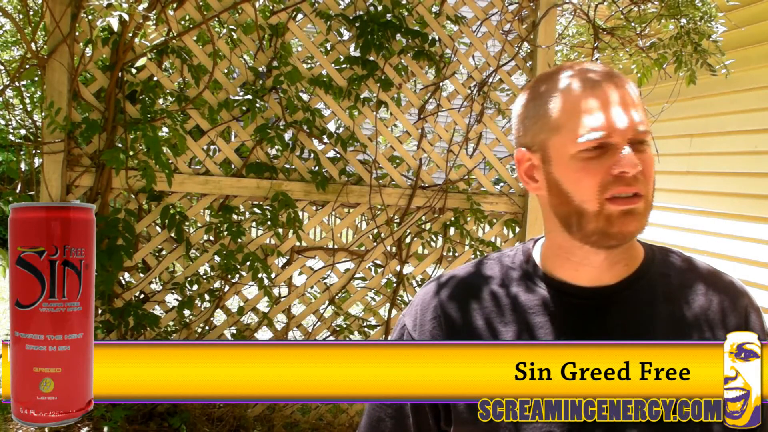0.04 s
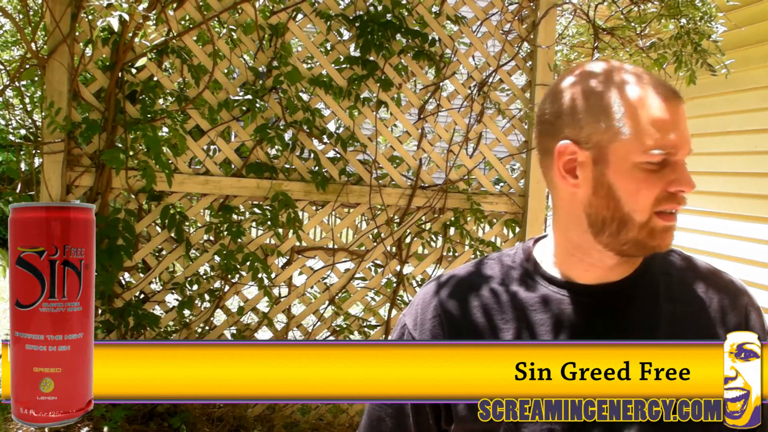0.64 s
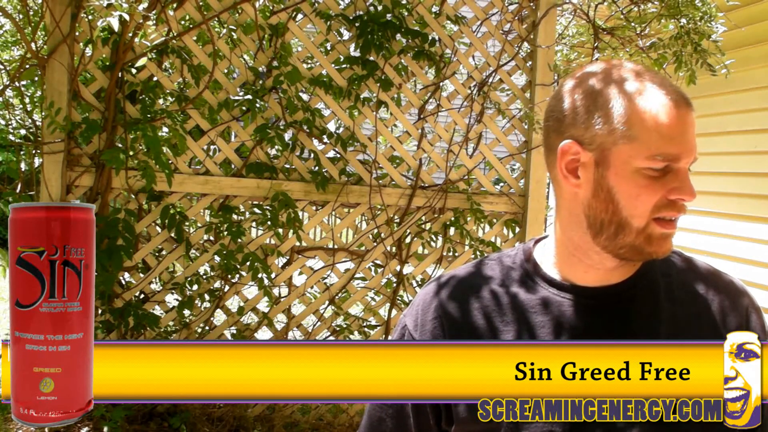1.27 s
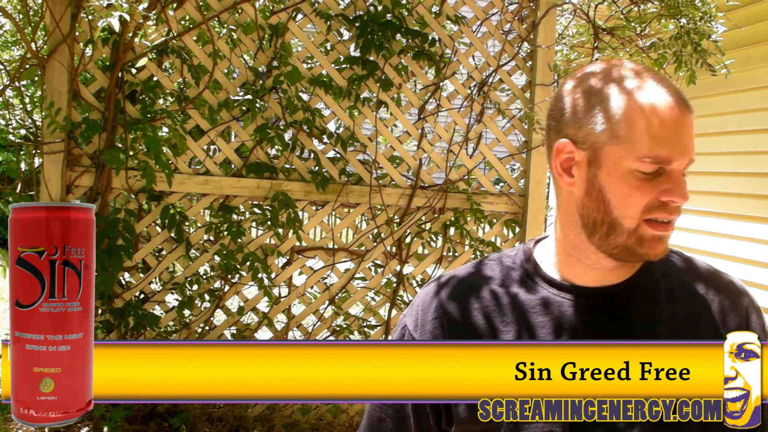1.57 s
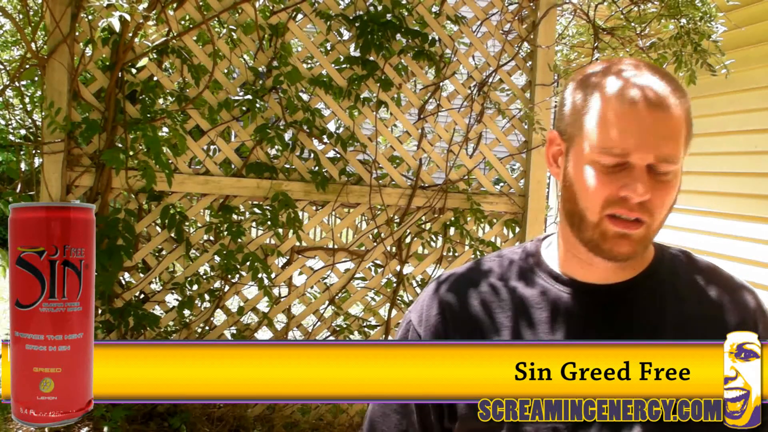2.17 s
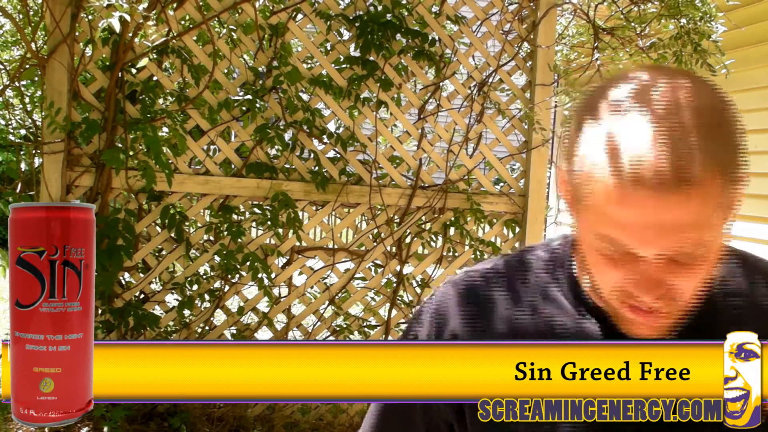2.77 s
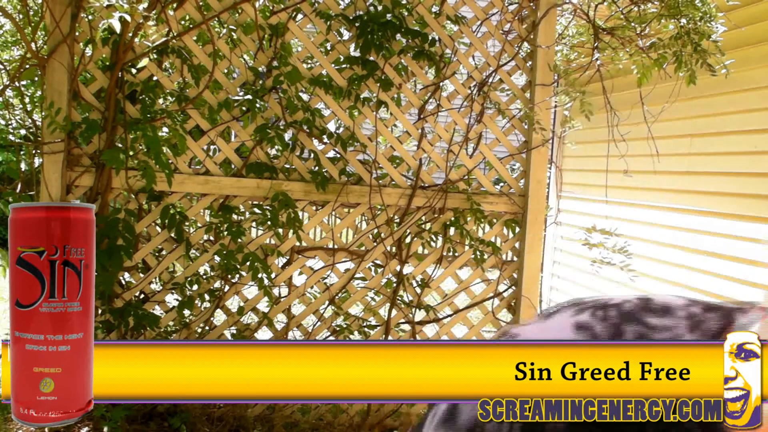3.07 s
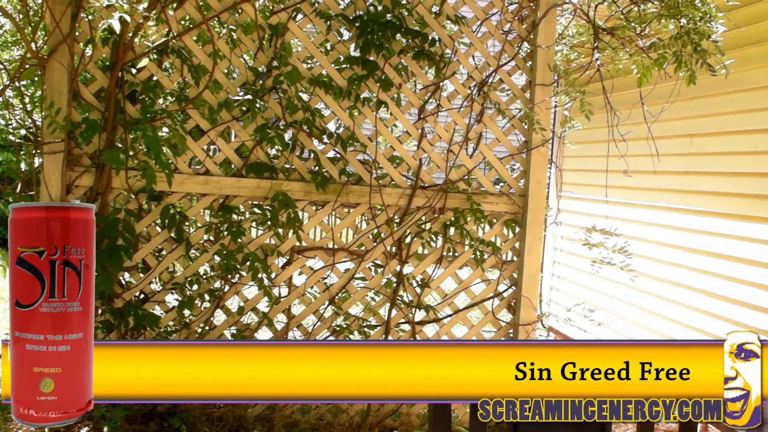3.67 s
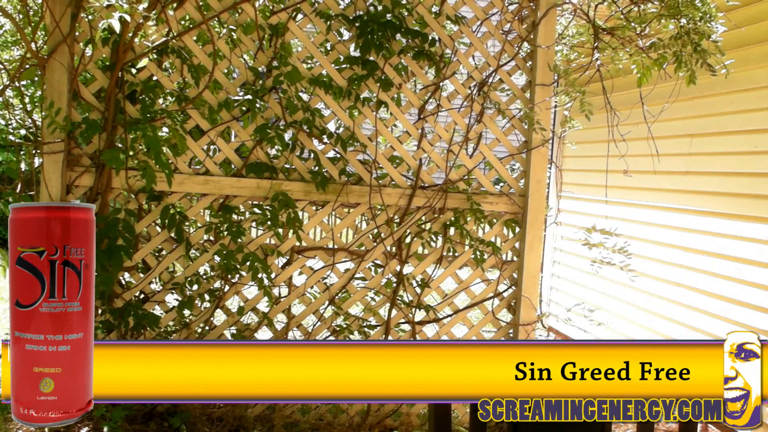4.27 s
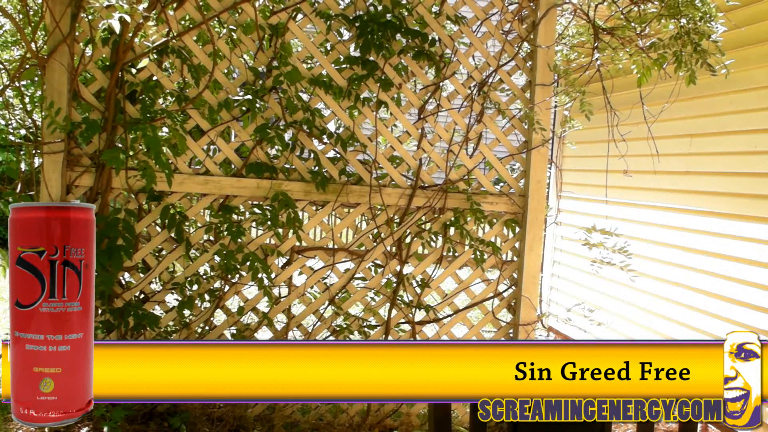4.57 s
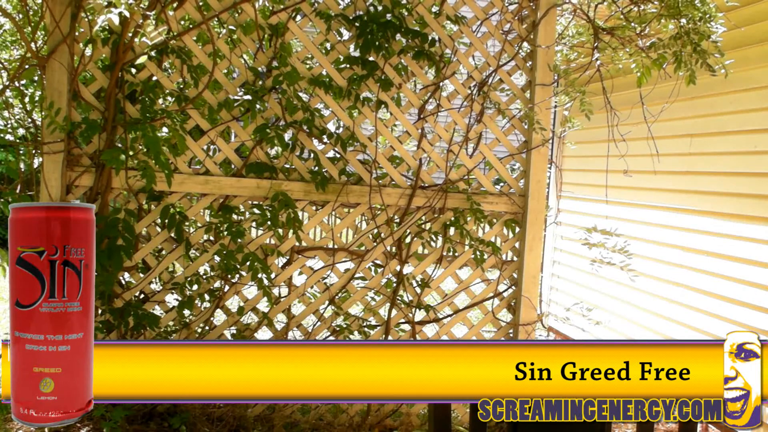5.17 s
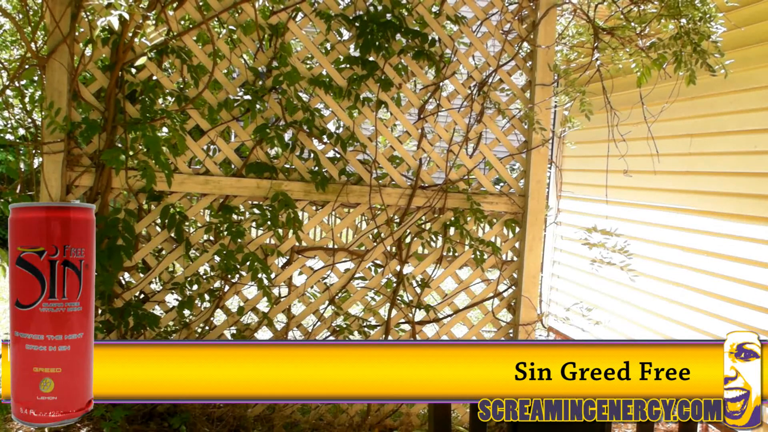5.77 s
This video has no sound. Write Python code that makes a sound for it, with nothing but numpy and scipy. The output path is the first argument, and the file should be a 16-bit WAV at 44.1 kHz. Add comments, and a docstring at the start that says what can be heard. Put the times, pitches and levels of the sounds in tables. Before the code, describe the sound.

A quiet yard holds a low neighbourhood rumble and a wavering hum throughout, with faint calls of distant birds. From about 1.5 seconds clothes rustle softly, with a few tiny dry ticks, as someone gets up and moves off. At 1.7 seconds a small bird nearby gives one slurred, falling chirp, then a loose run of short, gliding notes from 2.2 to 3.5 seconds, lightly echoing off a wall and fence. At about 3.4 seconds one sharp, rattling clack stands out as the loudest sound. The bird gives another falling chirp at 4 seconds and a very brief, sharp chip near 4.75. Soft wooden knocks of feet and furniture and a few light shoe scuffs are scattered between 2 and 5.2 seconds, the clearest near 4.6. The rustling fades by about 5.3 seconds, leaving the hum and a faint distant call.

```python
"""A quiet yard beside a house wall and a fence, where a small bird sings short, slurred, mostly falling chirps.
Its syrinx gives a gliding near-sine tone, which hard surfaces reflect and foliage scatters.
Someone gets up and moves off: friction rustles the clothes, and impacts give one rattling clack and
a few soft knocks. Faint high overtones of the near bird's chirps and the calls of distant birds
sound over a low neighbourhood rumble and a wavering hum."""
import sys
import numpy as np
from scipy import signal
from scipy.fft import rfft, irfft, next_fast_len
from scipy.io import wavfile

SR = 44100
rng = np.random.default_rng(int(sys.argv[2]) if len(sys.argv) > 2 else 0)


def output_pcm(signal):
    """Save a mono or channel-first signal as 16-bit PCM at the path in sys.argv[1].

    Samples are clipped to [-1, 1] before scaling.
    """
    pcm = np.clip(np.atleast_2d(signal).T, -1, 1) * 32767
    wavfile.write(sys.argv[1], SR, np.round(pcm).astype(np.int16))


N = 256734
TIME = np.arange(N) / SR

# Levels in the tables are relative; the mix adds further gain.
# near bird's slurs: (crest time [s], scoop length [s], fall length [s], foot length [s],
# scoop pitch [Hz], scoop level [dB], fall level [dB], foot level [dB])
SLURS = [(1.7615, .063, .090, .045, 3210, -35, -32, -42),
         (3.9598, .070, .077, .050, 3148, -27.3, -25.3, -37.5)]
# its other syllables: (time [s], length [s], first pitch [Hz], middle pitch [Hz], last pitch [Hz],
# opening flick [Hz], level [dB], attack [s], release [s])
SYLLABLES = [ (2.188, .059, 3266, 2858, 1971, 29, -29.7, .037, .027),
             (2.2417, .033, 2601, 2778, 3295, 0, -29.3, .023, .001),
             (2.2721, .086, 2822, 2425, 2298, 579, -27.4, .002, .052),
             (2.3434, .079, 2389, 2247, 2700, 67, -33.3, .027, .006),
             (2.7425, .060, 2490, 2424, 2280, 0, -30.6, .036, .010),
             (2.8028, .103, 2342, 2598, 2912, 9, -27.4, .026, .008),
             (3.2658, .113, 3208, 2973, 2279, -40, -27, .033, .001),
             (3.380, .066, 2300, 2570, 2720, 0, -30.5, .003, .035),
             (3.4465, .053, 3269, 2556, 2573, 469, -26.7, .004, .011),
             (4.7486, .007, 3340, 2804, 1900, 190, -20.6, .001, .006),
             (4.7532, .015, 2620, 2521, 2620, 420, -21.5, .006, .001)]
# one drier low pip, columns as in SYLLABLES
PIP = (2.919, .060, 2120, 2143, 2128, -70, -23.8, .036, .016)
# reflections off wall and fence: (delay [s], left gain [dB], right gain [dB])
ECHOES = [(.0062, -8.5, 0), (0.0125, -1, -10.5), (.016, -1, 1), (.020, 3, -13), (.031, -10, -4),
          (.044, -15, -4), (.083, -13, -12)]
# foliage returns the top of the song most strongly: (frequency [Hz], gain [dB])
LEAF_SPECTRUM = [(2000, -1), (2800, 0), (3450, 2.5), (3900, -4)]
# hard contacts of the clack: (time [s], body level [dB], crack level [dB])
CONTACTS = [(3.3466, -11, -13.5), (3.352, -11.5, -19), (3.3572, -5.5, -18), (3.3575, -13.5, -25),
            (3.362, -11.5, -12), (3.367, -4, -11.5), (3.3716, -8, -10), (3.3766, -8.5, -11.5),
            (3.380, -9.5, -10), (3.387, -20, -14.5)]
# soft knocks of feet and furniture: (time [s], level [dB])
KNOCKS = [(1.937, -36), (3.583, -40), (4.015, -35), (4.633, -30.5), (4.644, -40), (5.170, -39)]
# modes of the struck parts: (frequency [Hz], level [dB], 60 dB decay time [s])
CLACK_MODES = [(480, 0.5, 0.04), (546, 3, .1), (726, -1.5, 0.16), (896, 4.5, 0.14), (930, -10, .1),
               (1134, -9, 0.091), (1300, 6, 0.078), (1580, -8, 0.064), (1735, 1, .14), (1924, -16, .14),
               (2070, -3, 0.12), (2247, 1, 0.12)]
KNOCK_MODES = [(200, -32.5, .07), (404, -10, 0.18), (510, 6, 0.024), (580, -6, 0.056), (833, -10, 0.049),
               (1180, -26, 0.024)]
# swells of cloth noise and of rumble: (peak time [s], length [s], level [dB])
SWISHES = [(1.76, .2, -51.5), (2.33, 0.35, -51), (2.87, 0.24, -48), (3.12, 0.31, -46.5),
           (3.54, 0.14, -42.5), (4.07, 0.25, -44.5), (4.80, .2, -59)]
RUMBLE_SWELLS = [(4.42, .95, -54.5)]
# shoe scuffs and, at 3.337 s, a very brief swell of noise just before the clack:
# (peak time [s], length [s], level [dB])
BRIEF_SWELLS = [(2.978, 0.14, -46), (3.337, .013, -31), (4.639, 0.072, -46), (5.167, 0.089, -44.5)]
# tiny dry ticks: (time [s], level [dB], centre frequency [Hz])
TICKS = [(1.630, -46, 9050), (1.692, -39, 11500), (1.740, -30.5, 5300), (3.116, -40, 12000),
         (3.550, -43, 9500), (3.847, -38, 6500), (3.985, -39, 12500), (4.144, -33, 13000),
         (4.748, -40, 5000)]
# faint high overtones of the near bird's chirps (at 2.20 and 3.915 s) and distant calls (the rest):
# (time [s], length [s], first pitch [Hz], last pitch [Hz], level [dB])
FAINT_GLIDES = [(.84, .13, 6700, 6600, -61), (0.779, .31, 2700, 2826, -61), (0.979, .10, 2350, 2150, -56.5),
                (1.06, 0.074, 6300, 6700, -62), (1.35, 0.04, 5400, 6400, -58),
                (1.44, 0.069, 2950, 3080, -59), (2.20, .055, 5880, 5430, -53),
                (3.915, .09, 6400, 7100, -57), (4.39, .11, 2974, 2580, -49.5),
                (4.49, 0.111, 2160, 1980, -52), (4.654, 0.091, 6650, 6950, -56),
                (4.89, .18, 1443, 1400, -55.5), (5.698, 0.11, 1335, 1360, -56.5)]
# one hoarse distant call, columns as in FAINT_GLIDES
RASP = (2.915, .10, 4120, 3760, -49.5)
# noise spectra: (frequency [Hz], spectral density level [dB])
BODY_SPECTRUM = [(70, -34), (130, -8), (250, -17), (460, 1), (800, 0.3), (1300, 0), (1750, 0), (2500, -9),
                 (3500, -5.5), (5600, -14.5), (7000, -12), (9000, -49)]
CRACK_SPECTRUM = [(1500, -19), (3000, -3), (6300, -1.5), (7600, -10.5), (10000, -4), (15500, -8.5)]
RUSTLE_SPECTRUM = [(500, 4), (1500, 7.5), (4000, 2.5), (6300, 3), (7800, -9.5), (11000, -2.5), (15500, -5)]
BRIEF_SWELL_SPECTRUM = [(200, 6), (600, 10.5), (1500, 1.5), (4000, -0.5), (8000, -7.5), (12000, -2.5),
                        (15500, -7)]
AIR_SPECTRUM = [(22, -40), (38, -15.5), (70, -9), (112, -3.5), (131, -3), (145, -10.5), (228, -15),
                (259, -23), (417, -8.5), (984, -18), (1170, -19.5), (1470, -22), (3060, -26.5),
                (4040, -29.5), (15800, -40)]
RUMBLE_SPECTRUM = [(55, -7), (78, 0), (100, -8), (200, -39), (1000, -90)]
# likeness of the channels for near and far noise: (frequency [Hz], correlation [-1 to 1])
NEAR_CORRELATION = [(200, .9), (1400, 0.78), (3100, 0.57), (6800, -0.1), (13000, -0.019)]
FAR_CORRELATION = [(60, 0.99), (150, 0.93), (380, 0.9), (950, 0.88), (2380, 0.56), (5980, 0.04),
                   (15000, -0.17)]
# stereo balance of the air: (frequency [Hz], left minus right [dB])
AIR_BALANCE = [(60, -1.5), (180, -2.5), (550, -1.5), (1650, -1.5), (4970, 0.5), (15000, 0)]


def near_bird():
    """Multipath propagation: the song arrives directly, off hard surfaces and through foliage."""
    notes = [note for row in SLURS for note in slur(*row)] + [syllable(*row) for row in SYLLABLES]
    song = from_db(-3) * whistle(notes, waver=.0041, edge_s=.0022, overtone_db=-37)
    pip = whistle([syllable(*PIP)], waver=.002, edge_s=.004, overtone_db=-40)
    direct = (song + pip) * pan(-.3)
    spread = song + from_db(-14) * pip
    echoes = sum(delayed(spread, s) * from_db([[left], [right]]) for s, left, right in ECHOES)
    early = from_db(-7) * scatter(spread, t60=.15, build_s=.004, correlation=.24)
    leaf_gain = from_db(at_hz(LEAF_SPECTRUM, np.fft.rfftfreq(N, 1 / SR)))
    leafy = irfft(rfft(spread) * leaf_gain, N)
    late = from_db(-5) * scatter(leafy, t60=.72, build_s=.02, correlation=.49)
    return direct + echoes + early + late


def whistle(notes, waver, edge_s, overtone_db):
    """Self-sustained oscillation: the syrinx gives a gliding, slightly trembling near-sine tone."""
    out = np.zeros(N)
    tremble = 1 + waver * drift(120)
    for note in notes:
        s, hz, level_db = np.transpose(note)
        on = (TIME >= s[0]) & (TIME <= s[-1])
        t = TIME[on]
        phase = 2 * np.pi * np.cumsum(np.interp(t, s, hz) * tremble[on]) / SR
        edges = np.sin(np.pi / 2 * np.clip(np.minimum(t - s[0], s[-1] - t) / edge_s, 0, 1)) ** 2
        tone = np.sin(phase) + from_db(overtone_db) * np.sin(2 * phase)
        out[on] += np.sqrt(2) * from_db(np.interp(t, s, level_db)) * edges * tone
    return out


def syllable(start, length, first_hz, middle_hz, last_hz, flick_hz, level_db, attack_s, release_s):
    """Frequency and amplitude modulation of one note, as rows of (time [s], pitch [Hz], level [dB])."""
    swell_db, flick_share = 20, .11
    u = np.linspace(0, 1, 60)   # share of the note elapsed
    bow_hz = middle_hz - (first_hz + last_hz) / 2
    arc_hz = first_hz + (last_hz - first_hz) * u + bow_hz * (1 - (2 * u - 1) ** 2)
    hz = arc_hz + flick_hz * np.exp(-u / flick_share)
    rising = np.maximum(1 - u * length / (attack_s + 1e-9), 0)
    fading = np.maximum(1 - (1 - u) * length / (release_s + 1e-9), 0)
    return np.transpose([start + u * length, hz, level_db - swell_db * (rising ** 2 + fading ** 2)])


def slur(crest, scoop_s, fall_s, foot_s, scoop_hz, scoop_db, fall_db, foot_db):
    """A continuous frequency sweep: a scoop up to a crest, a fading fall and a low, held foot."""
    flick_hz, crest_hz, mid_hz, bottom_hz, foot_hz = 786, 3515, 2385, 1740, 2055
    lift_hz = foot_hz - bottom_hz
    scoop = syllable(crest - scoop_s, scoop_s, scoop_hz, scoop_hz, crest_hz, flick_hz, scoop_db, .028, 0)
    fall = syllable(crest, fall_s, crest_hz, mid_hz, bottom_hz, 0, fall_db, 0, .087)
    foot = syllable(crest + fall_s, foot_s, foot_hz, foot_hz, foot_hz, -lift_hz, foot_db, .004, .003)
    return [scoop, fall, foot]


def clack():
    """Impact excitation: hard parts chatter, each contact giving a thud, a crack and a short ring."""
    s, body_db, crack_db = np.transpose(CONTACTS)
    blows = strikes(s, body_db)
    body = dying(blows, t60=.022) * noise(BODY_SPECTRUM, NEAR_CORRELATION)
    crack = dying(strikes(s, crack_db), t60=.021) * noise(CRACK_SPECTRUM, NEAR_CORRELATION)
    hit = body + crack + from_db(-21.5) * ring(blows, CLACK_MODES)
    bass_cut = signal.butter(2, 250, "high", fs=SR, output="sos")   # the clack carries little bass
    hit = signal.sosfilt(bass_cut, hit)
    wall = from_db(-2.5) * scatter(crack[0], t60=.16, build_s=.0087, correlation=-.091)
    deck = from_db(-13.5) * scatter(body[0], t60=.23, build_s=.0063, correlation=.76)
    yard = from_db(-24.5) * scatter(hit[0], t60=.62, build_s=.019, correlation=.69)
    return (hit + wall + deck + yard) * pan(-1.8)


def knocks():
    """Modal vibration of wood: soft contact excites little treble."""
    wood = ring(strikes(*np.transpose(KNOCKS)), KNOCK_MODES)
    wood = signal.sosfilt(signal.butter(2, [130, 1300], "band", fs=SR, output="sos"), wood)
    return wood + from_db(-4) * scatter(wood, t60=.13, build_s=.0063, correlation=.86)


def clothes(start_s=1.52, end_s=5.27, attack_s=.15, release_s=.45, crackles_per_s=260):
    """Friction noise: cloth rustles as the person moves, swishing and crackling at its creases."""
    moving = np.clip(np.minimum((TIME - start_s) / attack_s, (end_s - TIME) / release_s), 0, 1)
    motion = np.hypot(from_db(-59 + 7 * moving), swells(SWISHES))   # faint at rest
    creases = rng.random(N) < crackles_per_s / SR
    crackles = creases * from_db(4.1 * np.minimum(rng.exponential(1, N), 4))
    grain = .85 + .3 * rms_one(dying(crackles + 1e-18, t60=.006))
    flutter = from_db(1.15 * drift(33))
    return motion * flutter * grain * noise(RUSTLE_SPECTRUM, NEAR_CORRELATION)


def brief_swells():
    """Amplitude-modulated noise: three shoe scuffs, and a very brief swell just before the clack."""
    roughness = from_db(2.9 * drift(90))
    return swells(BRIEF_SWELLS) * roughness * noise(BRIEF_SWELL_SPECTRUM, NEAR_CORRELATION)


def ticks(bandwidth_hz=3500, t60=.06):
    """Resonance: each tiny noise burst is filtered around a high frequency of its own."""
    out = np.zeros((2, N))
    r = np.exp(-np.pi * bandwidth_hz / SR)
    hiss = noise([(1000, 0), (15000, 0)], NEAR_CORRELATION)
    for s, level_db, hz in TICKS:
        burst = dying(strikes([s], [level_db]), t60) * hiss
        out += signal.lfilter([1 - r, 0, r - 1], [1, -2 * r * np.cos(2 * np.pi * hz / SR), r * r], burst)
    return out


def faint_bird_tones():
    """Scattering outweighs direct sound in distant calls and two high overtones of the near bird."""
    tones = whistle([glide(*row) for row in FAINT_GLIDES], waver=.0173, edge_s=.01, overtone_db=-45)
    tones += whistle([glide(*RASP)], waver=.07, edge_s=.014, overtone_db=-40)
    return from_db(-2.5) * tones + scatter(tones, t60=.37, build_s=.0059, correlation=.33)


def glide(start, length, first_hz, last_hz, level_db):
    """A linear frequency sweep with soft ends."""
    middle_hz = (first_hz + last_hz) / 2
    return syllable(start, length, first_hz, middle_hz, last_hz, 0, level_db, .03, .029)


def neighbourhood(hum_hz=117.8, drone_hz=410):
    """Random modulation widens a machine hum and a far drone into narrow bands, over air and rumble."""
    air = from_db(-45.07 + .5 * drift(10)) * noise(AIR_SPECTRUM, FAR_CORRELATION, AIR_BALANCE)
    turn = 2 * np.pi * TIME
    hum = (.21 + .71 * drift(5.7)) * np.sin(turn * hum_hz) + .45 * drift(2.4) * np.cos(turn * hum_hz)
    drone = drift(68) * np.sin(turn * drone_hz) + drift(62) * np.cos(turn * drone_hz)
    rumble = (from_db(-65.5) + swells(RUMBLE_SWELLS)) * noise(RUMBLE_SPECTRUM, FAR_CORRELATION)
    return air + (from_db(-53) * hum + from_db(-55) * drone + rumble) * pan(-1.3)


def scatter(x, t60, build_s, correlation):
    """Diffuse scattering: convolution with a noise tail that builds up and decays."""
    t = TIME[:SR]
    mid, side = rng.standard_normal((2, SR)) * fade(t, t60) * (1 - np.exp(-t / build_s))
    tail = rms_one(stereo(mid, side, correlation)) / np.sqrt(SR)
    return signal.fftconvolve(x[None], tail, axes=1)[:, :N]


def ring(clicks, modes):
    """Modal superposition: each mode is a damped oscillator driven by the clicks."""
    out = np.zeros(N)
    for hz, level_db, t60 in modes:
        r, w = fade(1 / SR, t60), 2 * np.pi * hz / SR
        out += from_db(level_db) * signal.lfilter([0, np.sin(w)], [1, -2 * r * np.cos(w), r * r], clicks)
    return out


def strikes(times, levels_db):
    """Each blow is idealised as an impulse."""
    clicks = np.zeros(N)
    clicks[np.round(np.asarray(times) * SR).astype(int)] = from_db(levels_db)
    return clicks + 1e-18


def dying(clicks, t60):
    """Incoherent addition: the envelope of decaying bursts whose powers add."""
    return np.sqrt(signal.lfilter([1], [1, -fade(1 / SR, t60) ** 2], clicks ** 2))


def fade(t, t60):
    """Exponential damping by 60 dB in t60."""
    return np.exp(-np.log(1000) * t / t60)


def swells(rows):
    """A sum of Gaussian amplitude envelopes."""
    return sum(from_db(level_db) * np.exp(-(2 * (TIME - s) / length) ** 2) for s, length, level_db in rows)


def noise(spectrum, correlation, balance=((100, 0), (10000, 0))):
    """Spectral shaping of white noise, in stereo at unit power."""
    size = next_fast_len(N, real=True)
    hz = np.fft.rfftfreq(size, 1 / SR)
    mid, side = rfft(rng.standard_normal((2, size)))
    pair = stereo(mid, side, at_hz(correlation, hz)) * pan(at_hz(balance, hz))
    low_edge = np.minimum(hz / spectrum[0][0], 1) ** 2   # roll-off below the lowest point
    return rms_one(irfft(pair * low_edge * from_db(at_hz(spectrum, hz)), size)[:, :N])


def drift(rate_hz):
    """Random fluctuation: low-passed noise of unit power."""
    hz = np.fft.rfftfreq(N, 1 / SR)
    return rms_one(irfft(rfft(rng.standard_normal(N)) / (1 + (hz / rate_hz) ** 2), N))


def stereo(mid, side, correlation):
    """Weighted sum and difference of independent signals set the left-right correlation."""
    return np.sqrt(1 + correlation) * mid + np.sqrt(1 - correlation) * side * [[1], [-1]]


def pan(balance_db):
    """Left and right gains for a level difference, a cue to direction."""
    return from_db(np.array([[.5], [-.5]]) * balance_db)


def delayed(x, seconds):
    """Propagation delay along a longer path."""
    return np.interp(TIME - seconds, TIME, x, left=0, right=0)


def at_hz(points, hz):
    """Interpolation along a log-frequency axis."""
    known_hz, values = np.transpose(points)
    return np.interp(np.log(np.maximum(hz, 1)), np.log(known_hz), values)


def from_db(db):
    """Decibels to amplitude ratio."""
    return 10 ** (np.asarray(db) / 20)


def rms_one(x):
    """Normalisation to unit power."""
    return x / np.sqrt(np.mean(x ** 2) + 1e-20)


def scene():
    """Superposition: the pressures of all sources in the yard add."""
    foreground = near_bird() + clack() + knocks() + clothes() + brief_swells() + ticks()
    return foreground + faint_bird_tones() + neighbourhood()


def record(dry):
    """Clipping and band limiting: peaks stop at full scale and the top treble is cut."""
    cutoff_hz = 15900
    low_pass = signal.ellip(10, .1, 70, cutoff_hz, fs=SR, output="sos")
    return signal.sosfilt(low_pass, np.clip(dry, -1, 1))


dry = scene()
out = record(dry)
output_pcm(out)
```